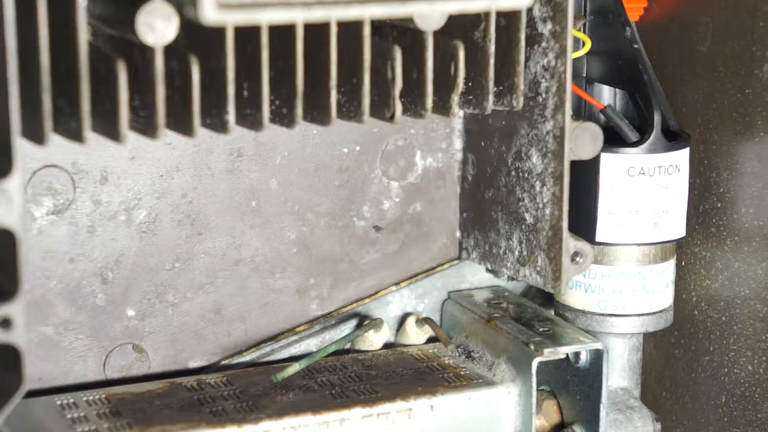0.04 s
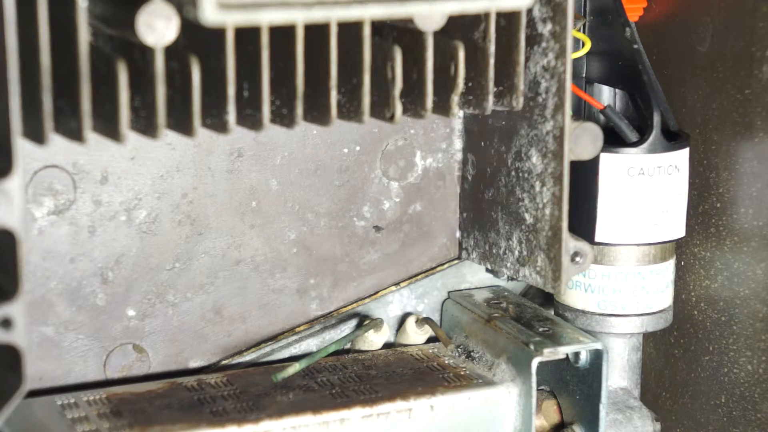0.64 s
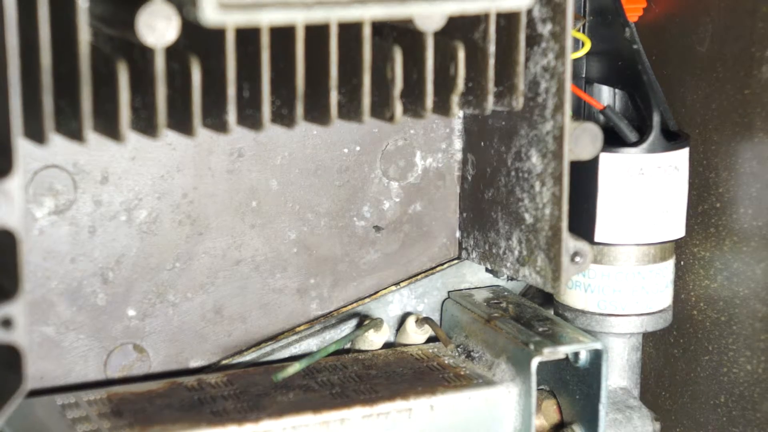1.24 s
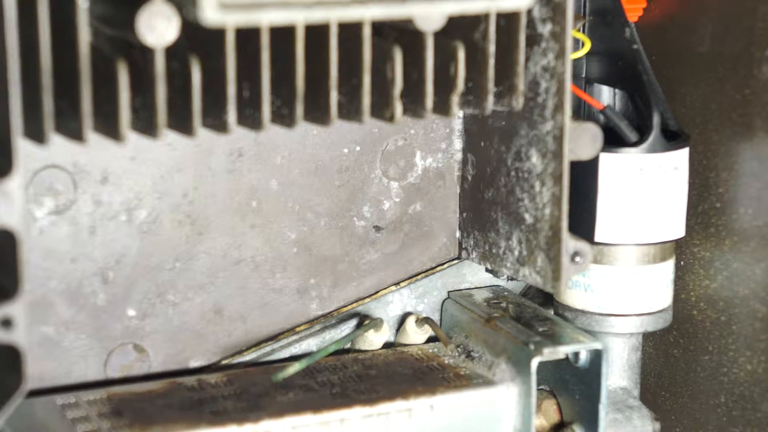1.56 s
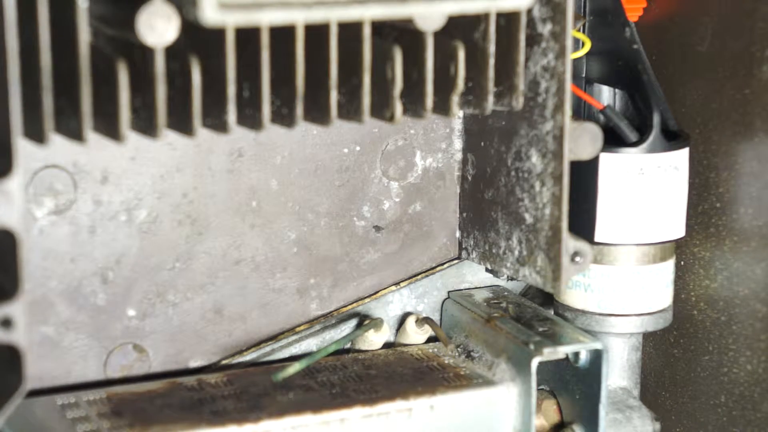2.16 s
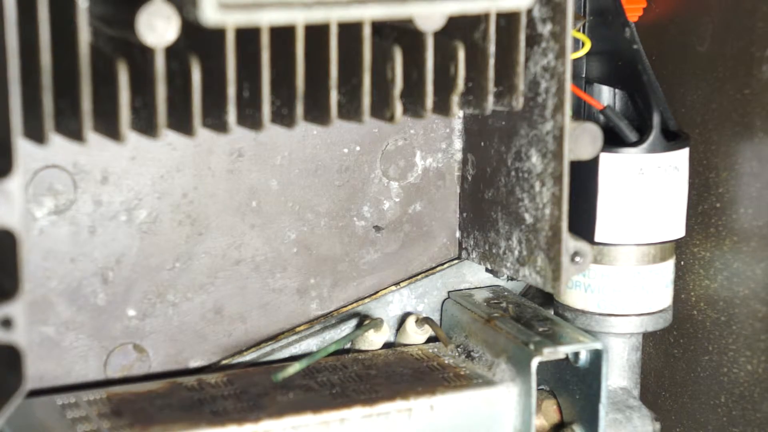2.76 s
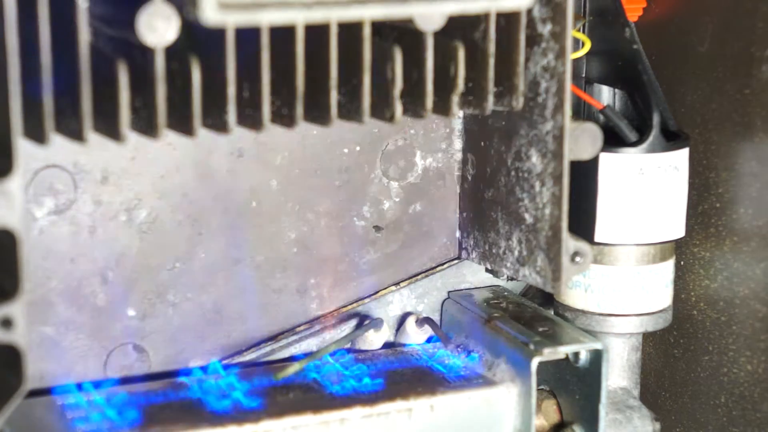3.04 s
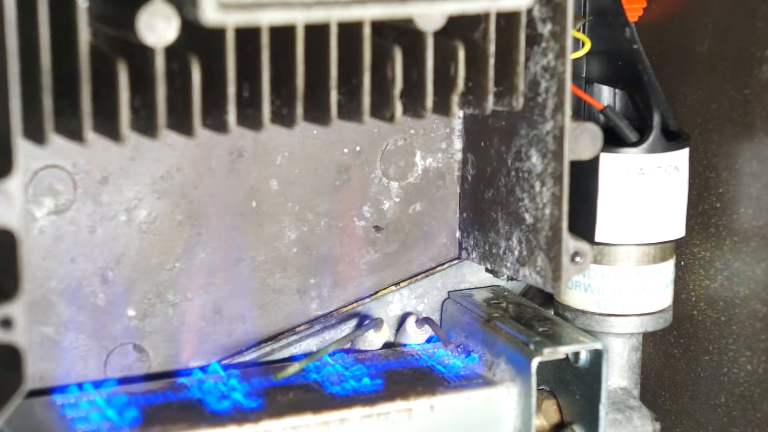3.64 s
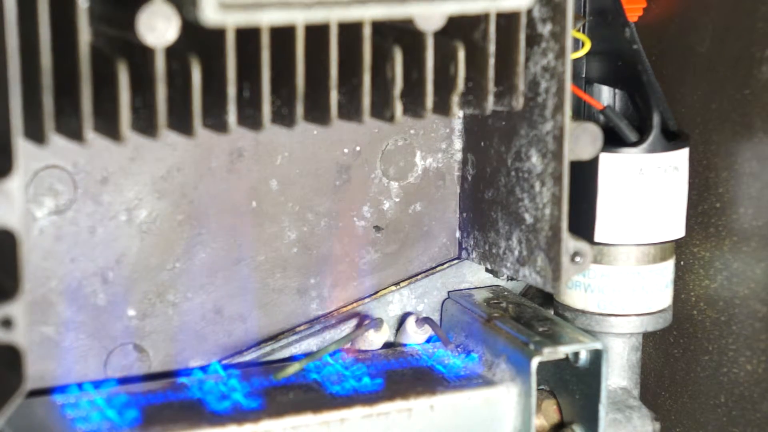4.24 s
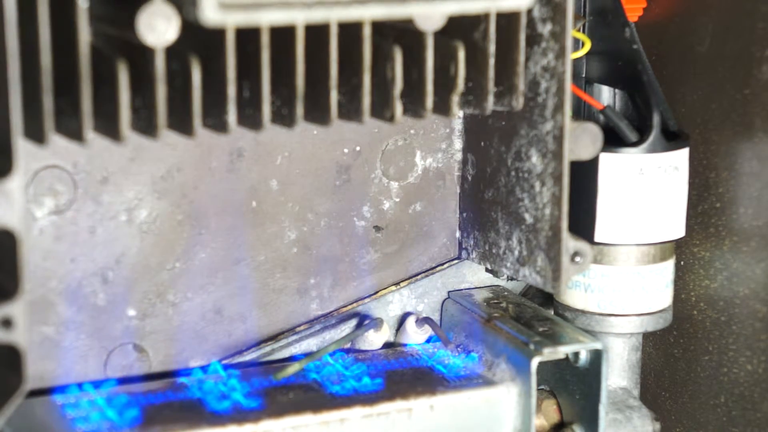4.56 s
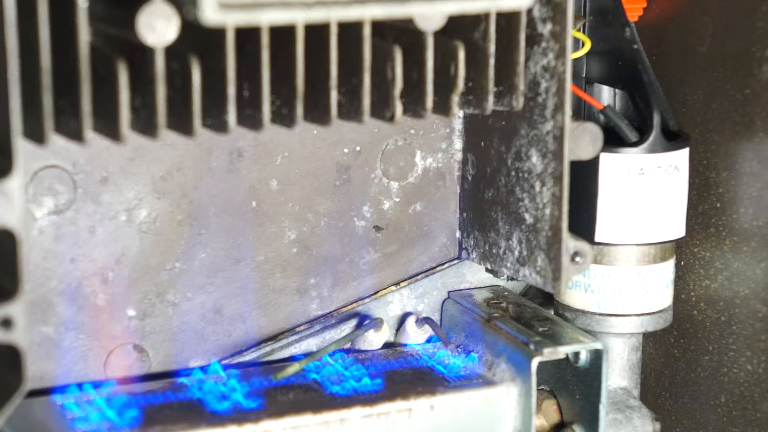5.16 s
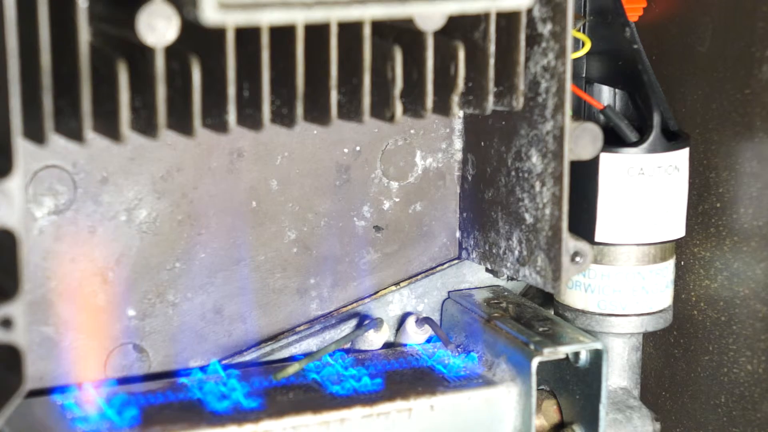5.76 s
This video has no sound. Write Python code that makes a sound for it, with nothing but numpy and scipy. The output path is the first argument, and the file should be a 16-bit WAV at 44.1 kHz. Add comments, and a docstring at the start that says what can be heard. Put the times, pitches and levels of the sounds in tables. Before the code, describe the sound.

After a clunk and a clack, three runs of sharp sparks snap inside a boiler until the gas catches with a whoosh and hisses faintly.

```python
"""Gas boiler lighting up

A stereo microphone stands close to a boiler in a hard, ringing room. The gas valve clunks open, a relay
clacks, and gas hisses while the igniter fires three bursts of sparks, ten a second. The last burst
lights the burner with a low whoosh. It burns on softly over the draught in the flue; the loose pipe
knocks now and then, and there is one faint squeak at the end."""
import sys
import numpy as np
from scipy import signal
from scipy.fft import rfft, irfft
from scipy.io import wavfile
from scipy.ndimage import uniform_filter1d, minimum_filter1d

SR = 44100
rng = np.random.default_rng(int(sys.argv[2]) if len(sys.argv) > 2 else 0)


def generate_wav(signal):
    """Clip the signal to [-1, 1] and save it as 16-bit WAV at the path in sys.argv[1]."""
    frames = np.transpose(np.atleast_2d(signal))
    scaled = np.clip(frames, -1, 1) * 32767
    pcm = np.round(scaled).astype(np.int16)
    wavfile.write(sys.argv[1], SR, pcm)


N = 259749
TIME = np.arange(N) / SR
VALVE_S, RELAY_S, LIGHT_S = 0.12, 0.2688, 2.866  # the valve clunks, the relay closes, the gas lights
CATCH_S = 0.03  # time the flame front takes to grow


def amp(db):
    """Decibels to gain."""
    return 10 ** (np.asarray(db) / 20)


def unit(x):
    """Scales to an average energy of 1 per channel."""
    return x / np.sqrt(np.mean(np.sum(x ** 2, -1)) + 1e-20)


def read(points, hz):
    """A table's value at hz, joined on a log-frequency axis."""
    f, value = np.transpose(points)
    return np.interp(np.log(hz + 1), np.log(f + 1), value)


def add(mix, s, sound):
    """Mixes a sound in at s seconds."""
    part = mix[:, max(round(s * SR), 0):][:, :sound.shape[-1]]
    part += sound[..., :part.shape[1]]


def colour(x, spectrum):
    """Filters x by rows of frequency in Hz and gain in dB."""
    n = x.shape[-1]
    return irfft(rfft(x) * amp(read(spectrum, np.fft.rfftfreq(n, 1 / SR))), n)


def pan(x, left_db):
    """Leans a sound to the microphone's left."""
    return x * amp(np.array([[left_db], [-left_db]]) / 2)


def envelope(start_s, attack_s, hold_s, fall_db_per_s):
    """A gain that swells from silence to 1, holds, and dies away."""
    age = TIME - start_s
    swell = np.clip(age / attack_s, 0, 1) ** 2
    return swell * amp(-fall_db_per_s * np.maximum(age - attack_s - hold_s, 0))


def wander(size):
    """A smooth random curve of rms 1 that changes over about size samples."""
    drift = uniform_filter1d(rng.standard_normal(N), size)
    return unit(uniform_filter1d(drift, size // 2)) * np.sqrt(N)


# How alike the microphone's two sides are. Each row: frequency in Hz, left-right correlation.
MIC_LIKENESS = [(130, 1), (270, 0.99), (570, 0.89), (1200, 0.73), (2500, 0.59), (5000, 0.24), (11000, 0.38)]

def noise(size, modes=()):
    """Stereo noise, alike in the bass, lifted or cut at the given resonances."""
    hz = np.fft.rfftfreq(size, 1 / SR)
    mid, side = rfft(rng.standard_normal((2, size)))
    same = np.clip(read(MIC_LIKENESS, hz), -1, 1)
    stereo = np.sqrt((1 + same) / 2) * mid + np.sqrt((1 - same) / 2) * side * np.array([[1], [-1]])
    lift_db = sum(db / (1 + (2 * (hz - f) / width) ** 2) for f, width, db in modes)
    return irfft(stereo * amp(lift_db), size)


def rush(spectrum, modes=()):
    """Steady turbulent noise of rms 1."""
    return unit(colour(noise(N, modes), spectrum)) * np.sqrt(N)


def pulse(spectrum, size=512):
    """A single pressure pulse, centred in its window."""
    return unit(colour(signal.unit_impulse(size, "mid"), spectrum) * np.hanning(size))


def clatter(spectrum, decay_s, size=4096):
    """A dense, quickly dying burst of noise."""
    burst = noise(size) * np.exp(-np.arange(size) / SR / decay_s)
    return unit(colour(burst, spectrum) * np.linspace(1, 0, size))


# Standing waves of the boiler's chamber, and the ring of its sheet-metal casing.
# Each row: frequency in Hz, width in Hz, lift in dB.
CHAMBER_MODES = [(121.9, 9.9, 11), (135.3, 6.8, 8.5), (195.3, 25.5, 9.5), (268.9, 16, 8), (582, 9.9, 9.5),
                 (648, 6.4, 2)]
CASING_MODES = [(854, 13, 4.5), (910, 6.8, 4), (929, 7.6, 0.5), (965, 10, -20), (1299, 7.3, 13),
                (1515, 40, 5), (1639, 54, 4), (1722, 6.4, 14), (1906, 6.5, 1), (3170, 110, 4),
                (6500, 20, -12)]
# The hard room around the microphone. Each row: frequency in Hz, seconds to fall by 60 dB.
ROOM_DECAY = [(60, 0.46), (130, 1), (400, 0.64), (600, 0.65), (800, 0.39), (1000, 0.57), (2000, 0.43),
              (3100, 0.42), (3260, 0.43), (3450, 0.38), (6000, 0.38), (9000, 0.27), (11000, 0.24)]

def room(x, build_s):
    """Echoes of casing and room build up, then die at a speed of their own in each band."""
    hz, t, bands = signal.stft(noise(SR, CHAMBER_MODES + CASING_MODES), SR, nperseg=512)
    decay = amp(-60 * t / read(ROOM_DECAY, hz)[:, None])
    tail = signal.istft(bands * decay, SR, nperseg=512)[1][:, :SR]
    build = 1 - np.exp(-np.arange(SR) / SR / build_s)
    return signal.fftconvolve(x.mean(0)[None], unit(tail * build), axes=1)[:, :N]


# Air in the flue, a low bed under everything. Each row: frequency in Hz, relative level in dB.
DRAUGHT_SPECTRUM = [(25, -37), (55, -14), (90, -7), (130, -6), (165, -2.5), (230, -2), (320, -2),
                    (400, -7.5), (850, -10), (1250, -9.5), (1700, -16.5), (2300, -23.5), (5000, -29),
                    (11000, -39)]

def draught(level_db=-56, gust_db=1.95, puff_db=4):
    """Draught rumbles unevenly in the flue, with a soft puff as the flame starts to flutter."""
    puff = envelope(3.51, attack_s=0.057, hold_s=0.044, fall_db_per_s=79)
    gain = amp(level_db + gust_db * wander(4000) + puff_db * puff)
    fade_in = np.interp(TIME, [0.04, 0.07], [0, 1])
    return fade_in * gain * rush(DRAUGHT_SPECTRUM, CHAMBER_MODES)


# Gas at the jet, a little to the left, and at the burner's ports.
# Each row: frequency in Hz, relative level in dB.
JET_SPECTRUM = [(1000, -56), (2500, -13), (3500, -12.5), (4100, -15), (5200, -11), (6300, -9), (7300, -6),
                (8050, 1.5), (8500, -6), (9050, 3.5), (9500, -7.5), (10000, -4.5), (11000, -15.5)]
PORT_SPECTRUM = [(150, 0), (300, -2), (800, -2), (1400, 1), (3000, -19.5)]

def gas_flow(jet_db=-61.5, ports_db=-62, warming_starts_s=3.18, warm_up_s=2.3):
    """Gas hisses through the jet as the valve opens; its rush at the ports fades as the burner warms."""
    flow = envelope(0.051, attack_s=0.097, hold_s=0, fall_db_per_s=0)
    cold = 1 - np.clip((TIME - warming_starts_s) / warm_up_s, 0, 1)
    jet = amp(jet_db) * flow * rush(JET_SPECTRUM)
    ports = amp(ports_db) * flow * cold * rush(PORT_SPECTRUM)
    return pan(jet, left_db=3.8) + ports


# Metal parts of valve and relay, close to the microphone. Each row: frequency in Hz, relative level in dB.
VALVE_SPECTRUM = [(60, -42), (150, -30.5), (400, -5.5), (800, -13.5), (1700, -3.5), (3000, -1), (4300, 1),
                  (5800, 2), (7000, 8), (8300, 11), (9600, 9), (11000, -3.5)]
RELAY_SPECTRUM = [(100, -52), (350, -38), (750, -13.5), (1150, -16), (1620, -8.5), (1900, -9.5), (2200, -6),
                  (2700, -18.5), (4300, -17), (6000, -9), (7150, -8.5), (7900, -17), (8800, -3.5),
                  (10500, -22.5)]

def armature(s, spectrum, decay_s, near_db, room_db, build_s):
    """The armature of the valve or relay slams home and sets the room ringing."""
    near, far = np.zeros((2, 2, N))
    add(near, s, amp(near_db) * clatter(spectrum, decay_s))
    add(far, s - 256 / SR, amp(room_db) * pulse(spectrum))  # the pulse's centre lands on s
    return near + room(far, build_s)


# Knocks of the gas pipe, dead centre, the first from the opening valve. Each row: start in seconds,
# level in dB, contact time in seconds, pitch as a factor on the modes, chatter level in dB.
PIPE_KNOCKS = [(.1200, -3, 0.00085, 1.044, -35), (.8503, -29.5, 0.00067, 1.06, 4),
               (.892, -41, 0.00071, 1.02, -5), (2.413, -40, .003, 1.08, -4),
               (4.1858, -27.5, .003, 1.055, -1)]
# The pipe's ring. Each row: frequency in Hz, relative level in dB, seconds for its decay to lose 60 dB.
PIPE_MODES = [(915, 2.5, 0.0083), (1273, -18.5, 0.012), (2187, -13.5, 0.012), (3446, -12.5, 0.011),
              (5000, -19, 0.0053)]

def pipe(near_db=14, room_db=9.5, valve_echo_db=7.5, chatter_s=0.01, touch_db=-7, rebound_db=-5.5):
    """Blows ring the loose gas pipe; a longer contact softens its high modes."""
    t = np.arange(2000) / SR
    near = np.zeros((2, N))
    for s, db, contact_s, pitch, chatter_db in PIPE_KNOCKS:
        ring = np.zeros_like(t)
        for hz, mode_db, t60 in PIPE_MODES:
            swing = (t / t60) ** 2 * amp(mode_db - 60 * t / t60)  # takes a few cycles to swing up
            ring += swing * np.sin(2 * np.pi * hz * pitch * t) / np.hypot(1, hz * contact_s)
        blow = amp(db) * unit(ring)
        add(near, s, blow)
        for k in (1, 2):  # touches lead up to the knock and rebounds follow, weaker further from it
            early_s, late_s = k * chatter_s * rng.uniform(0.85, 1.1, 2)
            add(near, s - early_s, amp(chatter_db + k * touch_db) * blow)
            add(near, s + late_s, amp(chatter_db + k * rebound_db) * blow)
    # the valve's knock rings louder in the room than the later knocks
    far = near * amp(valve_echo_db * (TIME < RELAY_S))
    radiated = colour(far, [(1200, 0), (2300, 4)])  # high modes reach the room more easily
    return amp(near_db) * near + amp(room_db) * room(radiated, build_s=0.061)


def spark_timer(start_s=0.2664, burst_every_s=1.2, spark_every_s=0.1012, first_db=-7.5, spread_db=2.5):
    """Time and level of each spark; a burst starts weak, the circuit not yet fully charged."""
    for (burst, k), chance in np.ndenumerate(rng.standard_normal((3, 4))):
        s = start_s + burst * burst_every_s + k * spark_every_s
        if s > RELAY_S:  # no power until the relay closes
            yield s, first_db * (k == 0) + spread_db * chance


# A spark straight from electrode to microphone, what fins and casing scatter into the room, and the
# snap it loses inside the flame. Each row: frequency in Hz, relative level in dB.
CRACK_SPECTRUM = [(100, -69), (350, -25.5), (700, -12), (2000, -15.5), (3500, -23), (5000, -8),
                  (6300, -11.5), (7400, 1.5), (9000, 6), (10000, 3), (11000, -11)]
SCATTER_SPECTRUM = [(150, -59), (600, -11.5), (1100, -15.5), (1750, -14.5), (2200, -11), (2850, -12.5),
                    (3200, -5), (4000, -7), (5300, -6.5), (6000, -11.5), (6700, -2.5), (7800, 2), (9000, 7),
                    (11000, -2.5)]
FLAME_DULLING = [(4500, -5.5), (8000, -12)]

def igniter(crack_db=13.5, casing_db=9, room_db=8.5):
    """Each spark is a half-millisecond crack, followed by the casing's reflections and the room."""
    in_air = pulse(CRACK_SPECTRUM), clatter(CRACK_SPECTRUM, decay_s=0.0032), pulse(SCATTER_SPECTRUM)
    in_flame = [colour(part, FLAME_DULLING) for part in in_air]
    near, far = np.zeros((2, 2, N))
    for s, db in spark_timer():
        crack, casing, scatter = in_flame if s > LIGHT_S + CATCH_S else in_air
        lead_s = len(crack) / 2 / SR
        add(near, s - lead_s, amp(db + crack_db) * crack)
        add(near, s + 0.00045, amp(db + casing_db) * casing)
        add(far, s - lead_s, amp(db + room_db) * scatter)
    return pan(near + room(far, build_s=0.028), left_db=2.8)


# The whoosh from close by, and its brighter flare. Each row: frequency in Hz, relative level in dB.
WHOOSH_SPECTRUM = [(25, -44), (38, -33), (55, -6), (130, -3.5), (220, -4.5), (400, -0.5), (620, 4),
                   (760, -5), (1000, -15), (2000, -27), (9000, -41)]
FLARE_SPECTRUM = [(100, -23), (400, -24), (650, 2), (850, 2), (1150, -9), (2000, -5.5), (3500, -9),
                  (6000, -10), (10000, -22)]
# The largest pockets of gas catching. Each row: start in seconds, relative level in dB.
GAS_POPS = [(2.895, 0), (2.926, -9), (2.938, 2), (2.9465, 0), (3.016, -5.5), (3.287, -25)]

def ignition(whoosh_db=-28.5, flare_db=-35, pop_db=2, room_db=-9):
    """A flame front flares along the burner with soft pops; the last gathered gas burns off slowly."""
    front = envelope(LIGHT_S, CATCH_S, hold_s=0.071, fall_db_per_s=175)
    afterburn = amp(-28) * envelope(LIGHT_S, CATCH_S, hold_s=0.071, fall_db_per_s=10.5)
    flare = envelope(LIGHT_S, CATCH_S, hold_s=0.068, fall_db_per_s=330)
    near = amp(whoosh_db) * np.hypot(front, afterburn) * rush(WHOOSH_SPECTRUM)
    near += amp(flare_db) * flare * rush(FLARE_SPECTRUM)
    for s, db in GAS_POPS:
        add(near, s, amp(db + pop_db) * clatter(WHOOSH_SPECTRUM, decay_s=0.0022))
    return near + amp(room_db) * room(near, build_s=0.007)


# The lit burner, soft even this close. Each row: frequency in Hz, relative level in dB.
FLAME_SPECTRUM = [(60, -29), (220, -1), (450, 3), (800, -2.5), (1400, 6), (2000, -13), (5000, -12.5),
                  (10000, -11)]

def flame(level_db=-59, flicker_db=1.5):
    """The young flame flutters for a while, then settles."""
    swell = envelope(3.48, attack_s=0.098, hold_s=0.8, fall_db_per_s=19)
    return swell * amp(level_db + flicker_db * wander(1500)) * rush(FLAME_SPECTRUM)


def squeak(s=5.817, length_s=0.0307, start_hz=1620, end_hz=1150, level_db=-53, roughness=0.084):
    """A faint, rough, falling tone with a weaker octave above it."""
    size = round(length_s * SR)
    jitter = unit(uniform_filter1d(rng.standard_normal(size), 40)) * np.sqrt(size)
    hz = np.linspace(start_hz, end_hz, size) * (1 + roughness * jitter)
    phase = 2 * np.pi * np.cumsum(hz) / SR
    tone = np.sin(phase) + amp(-6) * np.sin(2 * phase)
    near = np.zeros((2, N))
    add(near, s, amp(level_db) * np.hanning(size) * tone)
    return near + amp(-5) * room(near, build_s=0.015)


def scene():
    """The boiler and its room as they reach the microphone."""
    valve = armature(VALVE_S, VALVE_SPECTRUM, decay_s=0.0072, near_db=1, room_db=18.5, build_s=0.18)
    relay = armature(RELAY_S, RELAY_SPECTRUM, decay_s=0.014, near_db=18, room_db=20.5, build_s=0.069)
    switches = pan(valve, left_db=2) + pan(relay, left_db=0.5)
    return switches + igniter() + pipe() + ignition() + draught() + gas_flow() + flame() + squeak()


def record(dry, threshold_db=-27, slope=0.88, recovery_db_per_s=48, sense_s=0.019, edge_hz=11150):
    """The recorder's gain dips at loud sounds and recovers slowly; peaks round off, top treble is cut."""
    keep = np.exp(-1 / (sense_s * SR))
    power = signal.lfilter([1 - keep], [1, -keep], (dry ** 2).mean(0))
    fall_db = recovery_db_per_s * TIME
    held_db = np.maximum.accumulate(10 * np.log10(power + 1e-12) + fall_db) - fall_db
    over_db = np.maximum(held_db - threshold_db, 0)
    gain_db = uniform_filter1d(minimum_filter1d(-slope * over_db, 200), 150)  # looks 2 ms ahead
    rounded = 0.7 * np.tanh(dry * amp(gain_db) / 0.7)
    low_pass = signal.firwin(201, edge_hz, window=("kaiser", 7), fs=SR)
    return signal.oaconvolve(rounded, low_pass[None], "same")


dry = scene()
out = record(dry)
generate_wav(out)
```